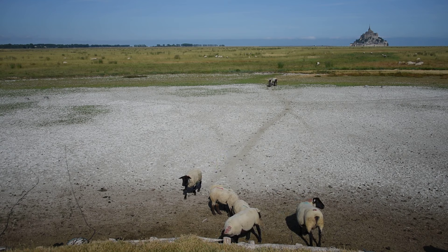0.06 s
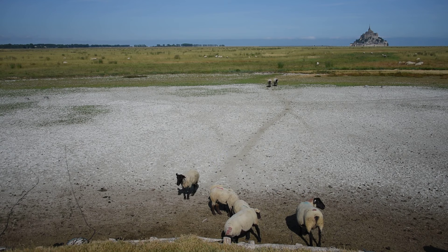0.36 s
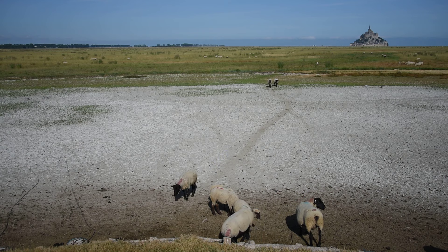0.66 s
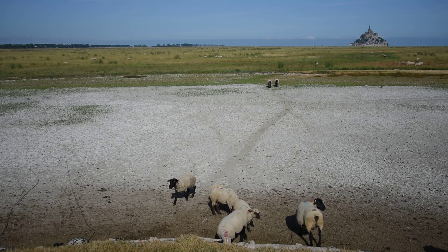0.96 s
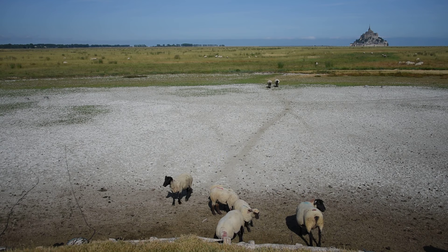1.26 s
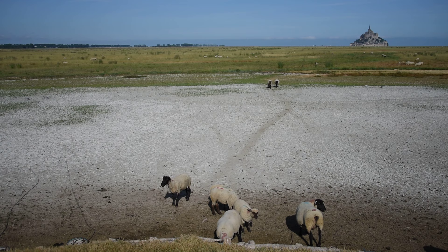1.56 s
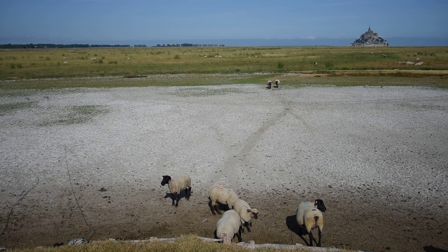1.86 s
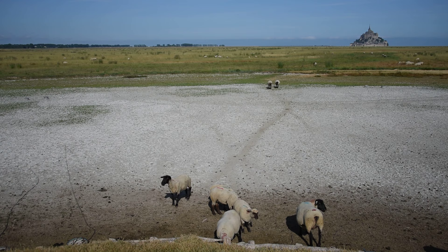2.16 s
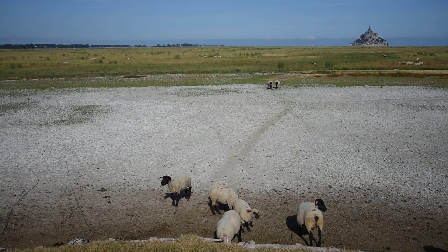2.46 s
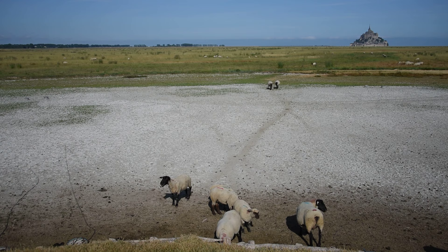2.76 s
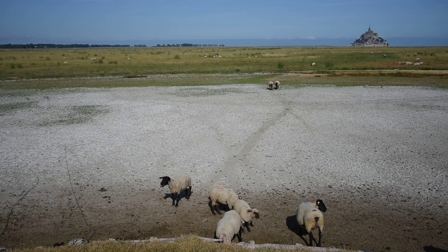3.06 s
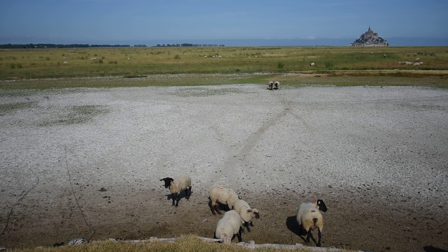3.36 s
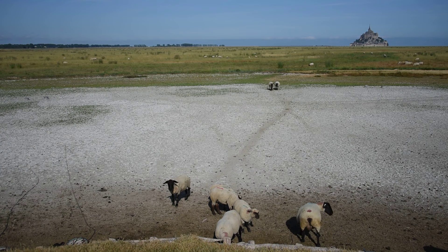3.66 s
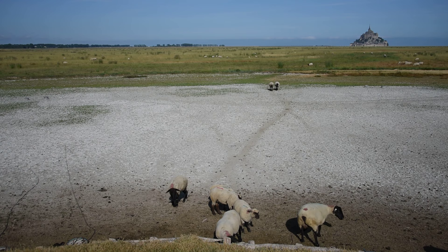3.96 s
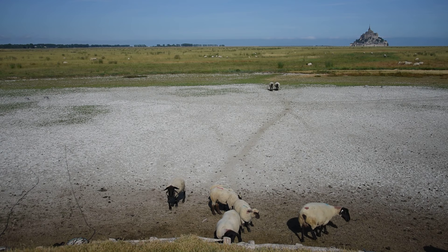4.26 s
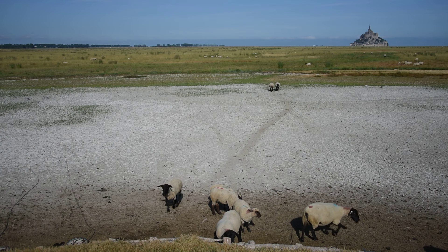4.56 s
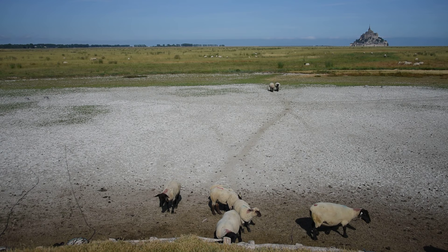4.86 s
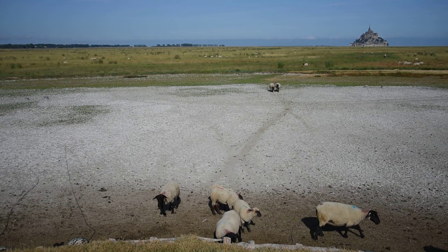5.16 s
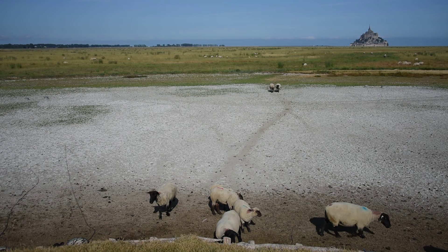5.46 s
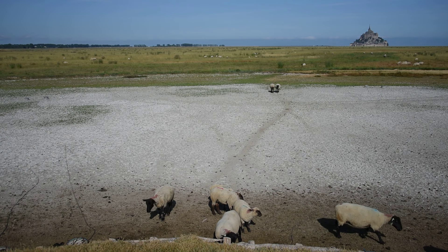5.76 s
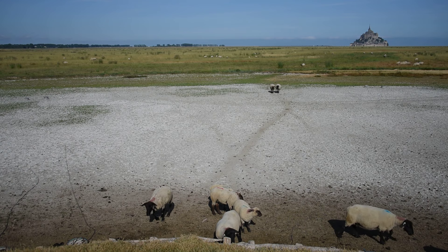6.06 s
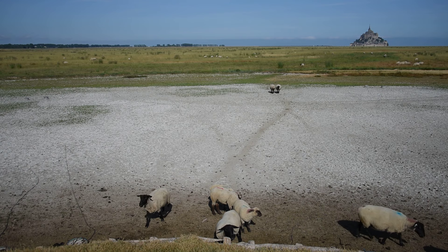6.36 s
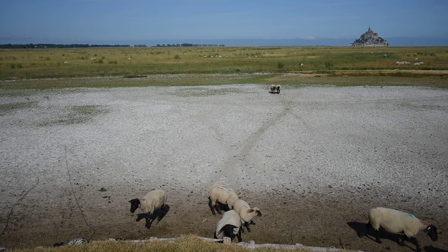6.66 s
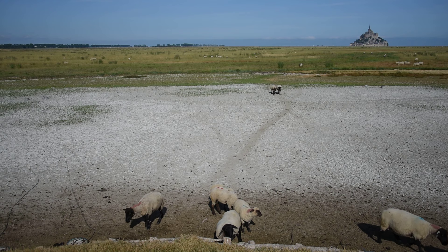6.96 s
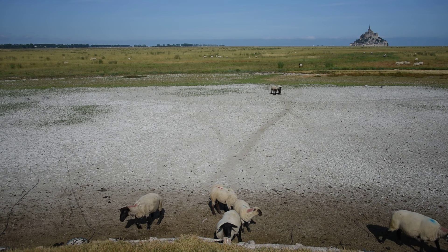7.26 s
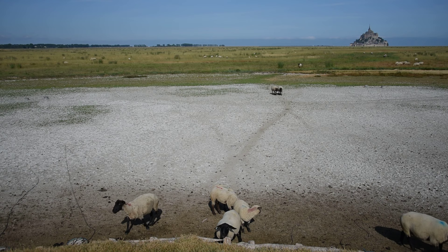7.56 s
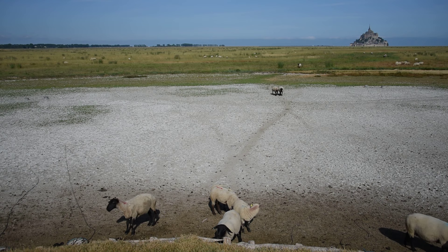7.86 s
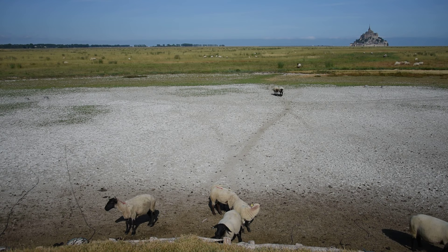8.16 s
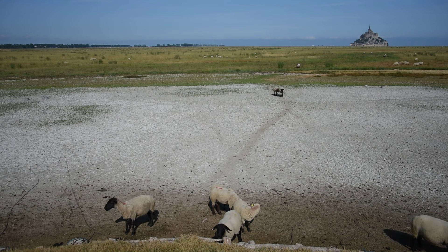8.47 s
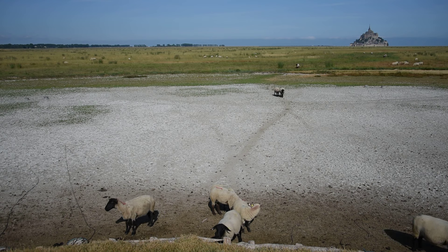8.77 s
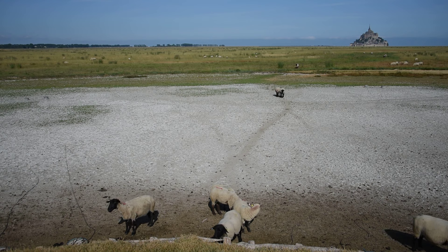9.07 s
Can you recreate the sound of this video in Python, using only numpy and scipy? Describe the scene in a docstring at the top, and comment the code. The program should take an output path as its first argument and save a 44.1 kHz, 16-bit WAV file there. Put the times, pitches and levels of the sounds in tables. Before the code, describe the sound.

A sheep close by gives a short closed-mouth hum followed by a single clear, steady bleat lasting about a second. Before and after it, uneven gusts buffet the microphone over a faint hiss, with soft rustles of dry grass and light handling clicks. A distant small bird whistles faintly, mostly after the bleat. The place is open ground with no echo.

```python
"""An open mud flat, heard through the two microphone ports of a hand-held camera.
From the start wind buffets the ports, mostly the right, over a hiss of air and a faint electronic buzz
on the left. Dry grass rustles, the case ticks and creaks under a finger, and a small bird sings far off.
Two seconds in, a sheep hums through its nose, then opens its mouth in one long, clean bleat, its vocal
folds ringing the throat. Afterwards the bird sings on through the gusts."""
import sys
import numpy as np
from scipy import signal
from scipy.fft import rfft, irfft
from scipy.io import wavfile

SR = 44100
rng = np.random.default_rng(int(sys.argv[2]) if len(sys.argv) > 2 else 0)


def int16_out(signal):
    """Quantize to a 16-bit WAV file."""
    q = np.round(np.clip(np.atleast_2d(signal).T, -1, 1) * 32767)
    wavfile.write(sys.argv[1], SR, q.astype(np.int16))


N = 406602
TIME = np.arange(N) / SR


def amp(db):
    """Decibels to gain."""
    return 10 ** (np.asarray(db) / 20)


def unit_rms(x):
    """Scales each channel to rms 1."""
    return x / np.sqrt(np.mean(x ** 2, -1, keepdims=True) + 1e-30)


def curve(rows, at):
    """A table's other columns, interpolated along its first."""
    knots, *columns = np.transpose(rows)
    return [np.interp(at, knots, column) for column in columns]


def spectrum_db(points, hz):
    """A spectrum in dB, joined on a log-frequency axis."""
    return curve([(np.log(f), db) for f, db in points], np.log(hz + 1))[0]


def resonances(modes, hz):
    """Gain of a set of steep-sided resonances."""
    return np.sqrt(sum((amp(db) / (1 + ((hz - f) / width) ** 2)) ** 2 for f, width, db in modes))


def struck(gain):
    """Gives a gain curve the phase of a struck, ringing body."""
    log_gain = np.log(np.maximum(np.r_[gain, gain[-2:0:-1]], 1e-5))
    return np.exp(np.conj(signal.hilbert(log_gain)))[:len(gain)]


def noise(gain_at):
    """Unrelated noise for each port, coloured by a function of frequency."""
    white = rfft(rng.standard_normal((2, N)))
    return unit_rms(irfft(white * gain_at(np.fft.rfftfreq(N, 1 / SR)), N))


def drift(hz):
    """Random wandering up to about hz, for each port."""
    return noise(lambda f: np.exp(-(f / hz) ** 2))


def pan(left_db):
    """Port gains of mean power 1, the left louder by left_db."""
    gains = amp(np.array([[.5], [-.5]]) * left_db)
    return gains / np.sqrt(np.mean(gains ** 2, 0))


def add(mix, start_s, sound):
    """Mixes a sound in at start_s."""
    part = mix[..., round(start_s * SR):][..., :sound.shape[-1]]
    part += sound[..., :part.shape[-1]]


# The breeze across the flat, at each port: time_s, left_level_db, right_level_db
BREEZE = [(0, -33, -26.5), (1.2, -33.5, -25), (2.3, -36, -25.5), (2.6, -28.5, -22.5), (3.1, -32.5, -22.5),
          (4.1, -29, -22.5), (4.95, -32.5, -21.5), (5.6, -28.5, -23), (6.4, -36.5, -27),
          (7.7, -33.5, -30.5), (9.2, -34, -28.5)]
# Gusts at one port: middle_s, length_s, rumble_rise_db, flutter_rise_db, port (0 left, 1 right)
GUSTS = [(0.303, 0.12, 4, 7.5, 1), (0.671, 0.31, 2, 14.5, 1), (0.83, 0.28, 5, 11, 1),
         (1.234, 0.078, 3.5, 9.5, 1), (1.416, 0.12, 6, 18.5, 1), (1.502, 0.091, 3, 18.5, 1),
         (1.507, 0.15, 2, 22, 0), (1.711, 0.11, 7.5, 16.5, 1), (1.999, 0.075, 7, 16, 1),
         (2.122, 0.31, 7.5, 31, 0), (2.225, 0.1, 5.5, 11, 1), (3.24, 0.25, 9.5, 10, 0),
         (3.837, 0.59, 5, 15.5, 0), (3.876, 0.3, 2.5, 6.5, 1), (4.708, 0.32, 2, 8, 1),
         (5.662, 0.082, 6, 14.5, 0), (6.42, 0.35, 2.5, 11, 1), (6.76, 0.4, 5, 13, 1),
         (7.029, 0.1, 7, 27, 0), (7.054, 0.18, 7, -1, 1), (7.449, 0.14, 9.5, 16, 1),
         (7.715, 0.2, 6, 12.5, 1), (8.034, 0.16, 9, 14.5, 1), (8.304, 0.32, 3, 12, 1),
         (9.154, 0.026, 16, 22, 1)]


def wind_levels(calm_db=-26.5, calm_flutter_db=-39.5, flutter_slope=2.48):
    """Gusts arch over the breeze; flutter grows with the breeze more steeply than rumble."""
    rumble_db = np.array(curve(BREEZE, TIME))
    flutter_db = calm_flutter_db + flutter_slope * (rumble_db - calm_db)
    for middle_s, length_s, rumble_rise_db, flutter_rise_db, port in GUSTS:
        arch = signal.windows.cosine(int(length_s * SR))
        add(rumble_db[port], middle_s - length_s / 2, rumble_rise_db * arch)
        add(flutter_db[port], middle_s - length_s / 2, flutter_rise_db * arch)
    return rumble_db, flutter_db


def eddy(hz, turns=0.43):
    """An eddy passing a port is one swing of pressure, up and then down, centred in 50 ms."""
    t = np.arange(-SR // 40, SR // 40) / SR
    return -np.sin(2 * np.pi * hz * t) / np.cosh(hz * t / turns) ** 2


def sputter(each_per_s=4, slow_hz=160, fast_hz=310):
    """Small eddies of four sizes hit each port at random; the quicker ones are weaker."""
    out = np.zeros((2, N))
    for hz in np.geomspace(slow_hz, fast_hz, 4):
        hits = (rng.random((2, N)) < each_per_s / SR).astype(float)
        out += signal.oaconvolve(hits, eddy(hz)[None], "same", axes=1) * np.sqrt(slow_hz / hz)
    return out


# Rumble on the microphone; the right port faces the wind and rumbles higher: frequency_hz, gain_db
LEFT_RUMBLE = [(12, -33), (25, -33), (40, -8), (65, 7), (105, -1.5), (160, -3), (220, -14), (300, -24.5),
               (450, -33), (700, -67)]
RIGHT_RUMBLE = [(12, -50), (25, -30), (40, -6), (62, -3.5), (105, 0.5), (160, -3.5), (220, -8.5),
                (300, -18), (450, -45), (700, -100)]
# The flutter above the rumble, at both ports: frequency_hz, gain_db
FLUTTER = [(100, -38), (170, -7.5), (240, -1), (320, -4), (420, -12.5), (550, -24), (750, -35.5),
           (1100, -48), (2500, -54.5), (6000, -100)]


def wind(rumble_swing_db=3.5, flutter_swing_db=7.5, eddy_hz=60):
    """Each port has its own eddies, which shake the flutter harder than the rumble."""
    rumble_db, flutter_db = wind_levels()
    eddies = np.clip(drift(eddy_hz), -2, 2)
    rumble = noise(lambda f: amp([spectrum_db(LEFT_RUMBLE, f), spectrum_db(RIGHT_RUMBLE, f)]))
    rumble = unit_rms(rumble * amp(rumble_swing_db * eddies))
    flutter = noise(lambda f: amp(spectrum_db(FLUTTER, f)))
    flutter = unit_rms(flutter * amp(flutter_swing_db * eddies))
    return amp(rumble_db) * rumble + amp(flutter_db) * (amp(-3) * flutter + amp(11) * sputter())


# The colour of the open air: frequency_hz, gain_db
AIR = [(100, -88), (500, -61.5), (1000, -64.5), (2500, -69), (5000, -73), (10000, -71.5), (12000, -73),
       (13500, -90), (16000, -71.5)]


def air(level_db=-58.5):
    """A faint, steady hiss of air all around the microphone."""
    return amp(level_db) * noise(lambda f: amp(spectrum_db(AIR, f)))


# Resonances of the buzz inside the camera: centre_hz, half_width_hz, gain_db
BUZZ_MODES = [(5680, 170, -11), (6450, 190, -6), (7000, 170, -12), (7700, 210, 0), (8350, 200, -5),
              (10200, 900, -14)]
# Steady whines at the left port: pitch_hz, level_db
WHINES = [(8086, -66), (11806, -76), (15735, -75)]


def electronics(repeat_hz=59.94, burst_at_s=0.00401, burst_s=0.00067, buzz_db=-61, right_db=-22):
    """By the left port a short burst repeats at the picture rate and rings the case, beside thin whines."""
    period = round(SR / repeat_hz)
    t, hz = np.arange(period) / SR, np.fft.rfftfreq(period, 1 / SR)
    burst = rfft(rng.standard_normal(period) * np.exp(-.5 * ((t - burst_at_s) / burst_s) ** 2))
    cycle = irfft(np.exp(1j * np.angle(burst)) * resonances(BUZZ_MODES, hz), 20 * period)  # oversampled
    buzz = unit_rms(cycle[(TIME * repeat_hz % 1 * len(cycle)).astype(int)])
    whine = sum(np.sqrt(2) * amp(db) * np.sin(2 * np.pi * f * TIME) for f, db in WHINES)
    return amp([[0], [right_db]]) * (amp(buzz_db) * buzz + whine)


# Dry grass stirring left of the microphone: start_s, length_s, level_db, left_over_right_db
RUSTLES = [(0.21, 0.22, -54, 15), (0.362, 0.33, -56.5, 15), (0.626, 0.072, -53, 15), (1.158, 0.24, -58, 17),
           (1.464, 0.49, -54.5, 8), (1.817, 0.23, -50, 6.5), (4.082, .17, -60.5, 7), (5.302, 0.35, -63, 7),
           (5.767, 0.41, -64, 5), (7.405, 0.19, -60.5, 1)]
# The colour of its crackle: frequency_hz, gain_db
CRACKLE = [(600, -19), (2000, 10.5), (4500, 9), (8500, 10), (12000, 9), (16000, -4)]


def grass(grain_db=3.5, grain_hz=210):
    """Dry blades brush in short swells of fine crackle."""
    swells = np.zeros((2, N))
    for start_s, length_s, db, left_db in RUSTLES:
        add(swells, start_s, pan(left_db) * amp(db) * signal.windows.tukey(int(length_s * SR), .8))
    hiss = noise(lambda f: amp(spectrum_db(CRACKLE, f)))
    return swells * unit_rms(hiss * amp(grain_db * drift(grain_hz)[0]))


# Ticks of the camera, right at the microphone: start_s, peak_db, ring_hz, left_over_right_db
TICKS = [(.311, -35, 4480, 13), (0.784, -32.5, 2310, -1), (1.214, -39.5, 1660, 3), (4.571, -34, 3200, 5),
         (4.671, -40, 1690, -21), (4.747, -40.5, 2700, 6), (5.366, -31.5, 1250, -29), (5.439, -38, 3100, 6),
         (5.647, -43, 4800, 3), (5.856, -43, 2980, -2)]


def ticks(width_share=0.44, rattle_s=0.0014):
    """The hand-held case gives small, sharp rattles that die within milliseconds."""
    out, hz = np.zeros((2, N)), np.fft.rfftfreq(1024, 1 / SR)
    for start_s, peak_db, ring_hz, left_db in TICKS:
        ring = irfft(struck(resonances([(ring_hz, width_share * ring_hz, 0), (6000, 4000, -19)], hz)))
        rattle = rng.standard_normal(len(ring)) * np.exp(-TIME[:len(ring)] / rattle_s)
        tick = signal.fftconvolve(ring, rattle)
        add(out, start_s, pan(left_db) * amp(peak_db) * tick / abs(tick).max())
    return out


# Thumps of wind on the microphone: middle_s, strength_db, swing_hz, port (0 left, 1 right)
BUFFETS = [(.544, -5, 146, 1), (.623, -8, 374, 1), (0.65, -8.5, 390, 1), (.704, -11, 227, 1),
           (1.214, -5.5, 110, 1), (1.497, -16.5, 395, 0), (1.679, -7.5, 183, 1), (1.718, -9, 240, 1),
           (3.83, -4.5, 265, 0), (3.87, -17.5, 400, 0), (3.947, -14.5, 385, 0), (4.057, -25.5, 480, 0),
           (4.415, -6, 128, 1), (4.455, -6, 232, 1), (4.616, -5, 253, 1), (4.673, -14, 427, 1),
           (4.734, -17.5, 372, 1), (4.777, -22, 324, 1), (4.818, -21, 357.8, 1), (5.015, -14, 320, 1),
           (5.365, -4, 213, 1), (5.442, -8.5, 140, 1), (5.758, -14, 344, 1), (6.308, -6.5, 127, 1),
           (7.03, -15, 370, 0), (8.091, -3, 284, 1), (8.191, -6.5, 143, 1), (8.287, -18.5, 338, 1),
           (9.152, -12, 320, 1)]


def buffets(gain_db=-1.5):
    """The strongest eddies thump one port each."""
    out = np.zeros((2, N))
    for middle_s, db, hz, port in BUFFETS:
        swing = eddy(hz)
        add(out[port], middle_s - len(swing) / SR / 2, amp(db + gain_db) * swing)
    return out


# Resonances of the camera case: centre_hz, half_width_hz, gain_db
CASE_MODES = [(2900, 170, -1.5), (3570, 150, 6.5), (3840, 130, 0), (4540, 100, 2.5)]
# A finger slipping close to the left port: start_s, length_s, level_db, pitch_factor, scrape_db
SLIPS = [(0.632, 0.044, -45.5, 1.006, -6), (0.625, 0.33, -56, 1.01, -8), (0.813, 0.034, -50.5, 1, -6),
         (0.978, 0.044, -49, 0.97, -10), (1.207, 0.04, -57.5, .96, -5)]


def finger_creaks(left_db=7, jerks_per_s=1300, spread_db=3, scrape_hz=4800, scrape_width_hz=2200):
    """Skin sticks and lets go in uneven jerks; each one scrapes and rings the case."""
    out, hz = np.zeros((2, N)), np.fft.rfftfreq(1024, 1 / SR)
    for start_s, length_s, db, factor, scrape_db in SLIPS:
        n = int(length_s * SR)
        jerks = (rng.random(n) < jerks_per_s / SR) * rng.choice([-1, 1], n)
        jerks = unit_rms(jerks * amp(spread_db * rng.standard_normal(n))) * signal.windows.tukey(n, .6)
        modes = CASE_MODES + [(scrape_hz, scrape_width_hz, scrape_db)]
        ring = irfft(struck(resonances(modes, hz / factor)))
        add(out, start_s, pan(left_db) * amp(db) * signal.fftconvolve(jerks, ring / np.linalg.norm(ring)))
    return out


# The song from far across the flat: start_s, note_count, first_spacing_s, note_length_s, level_db,
# swell_per_note_db, pitch_factor, climb_per_note, shape_name
PHRASES = [(1.189, 1, 0, 0.26, -60, -1, 0.99, 0, "whistle"),
           (3.485, 2, 0.13, 0.086, -74, 0, 1, -0.17, "hook"),
           (3.924, 1, 0, 0.25, -55.5, -3, 0.98, 0, "whistle"),
           (4.338, 2, .285, 0.18, -50.5, -3, 0.98, -0.011, "slur"),
           (5.014, 4, 0.14, 0.052, -64, -2, 0.95, -0.015, "dip"),
           (5.791, 3, .171, 0.058, -64.5, 5, 1.08, -0.062, "pip"),
           (6.353, 3, 0.198, 0.058, -63, 2.5, 1.02, -0.017, "pip"),
           (6.937, 1, 0, 0.074, -56, 0, .98, 0, "flick"), (7.09, 5, .187, 0.108, -69, 0, 1, .004, "hook"),
           (8.169, 4, 0.12, 0.088, -57, 0.6, 1.01, -0.012, "flick"),
           (8.784, 1, 0, .16, -47, 0, 0.99, 0, "slur"), (9.134, 1, 0, 0.052, -63, 0, 1, 0, "dip")]


def song(slowing=1.04, spread_db=2.5):
    """Each phrase repeats one note, slowing a little, no two notes equally strong."""
    for start_s, count, spacing_s, length_s, db, swell_db, factor, climb, shape in PHRASES:
        for k in range(count):
            note_db = db + k * swell_db + spread_db * rng.uniform(-1.3, 1)
            yield start_s, length_s, note_db, factor + k * climb, shape
            start_s += spacing_s * slowing ** k


def scatter(x, fade_s=0.011, wet_db=-5):
    """Ground and grass smear a far sound with a brief diffuse tail at each port."""
    t = TIME[:SR // 8]
    tail = unit_rms(rng.standard_normal((2, len(t))) * np.exp(-t / fade_s)) / np.sqrt(len(t))
    diffuse = signal.oaconvolve(x[None], tail, axes=1)[:, :N]
    return (x + amp(wet_db) * diffuse) / np.hypot(1, amp(wet_db))


# The bird's note shapes by name: trill_depth (0-1), then points of share_of_note, base_pitch_hz, gain_db
NOTE_SHAPES = { "whistle": (.1, [(0, 4080, -17), (.3, 4320, -1), (.82, 4560, 1), (.9, 3900, -6),
               (1, 2880, -8)]), "slur": (0.82, [(0, 3530, -18), (.42, 4260, -6.5), (.8, 4620, -6.5),
               (.89, 3900, -9), (1, 2960, -5)]), "hook": (0.45, [(0, 4080, -3), (.3, 4560, 10),
               (.37, 4780, 5), (.48, 3850, 3), (.58, 3330, 9), (.8, 3180, 12), (1, 2880, 3)]),
               "pip": (0, [(0, 3740, -3), (.33, 3790, 1.5), (.65, 3735, 0), (1, 3540, -12)]),
               "dip": (0.28, [(0, 4340, 2), (.27, 4240, 3.5), (.34, 3680, -10), (.56, 3970, 1),
               (.62, 3100, -12), (.85, 3250, 9), (1, 2750, -10)]), "flick": (0.65, [(0, 2460, -18),
               (.25, 2105, -14.5), (.56, 2840, -6.5), (.64, 3300, -30), (.68, 4400, 3), (.75, 4620, 5.5),
               (.87, 3740, -7), (1, 3100, -21)])}


def bird(left_db=2, waver_share=0.0077, flicker_db=2, trill_hz=110, swing_hz=130, trill_db=4):
    """A far whistle glides through each note, some with a fast trill, wavering in the moving air."""
    out, wobble, flicker = np.zeros(N), drift(210)[0], drift(63)[0]
    for start_s, length_s, db, factor, shape in song():
        progress = np.linspace(0, 1, int(length_s * SR))
        t = progress * length_s
        depth, points = NOTE_SHAPES[shape]
        hz, shape_db = curve(points, progress)
        trill = depth * np.sin(2 * np.pi * trill_hz * t)
        waver = 1 + waver_share * np.interp(start_s + t, TIME, wobble)
        turns = np.cumsum(hz * factor * waver + swing_hz * trill) / SR
        envelope = amp(db + shape_db + trill_db * trill) * signal.windows.tukey(len(t), .12)
        add(out, start_s, envelope * np.sin(2 * np.pi * turns))
    return pan(left_db) * scatter(out * amp(flicker_db * flicker))


# The sheep's hum, mouth shut: time_s, pitch_hz, level_db
HUM = [(2.162, 215.4, -59), (2.2, 202.6, -51.5), (2.236, 166.7, -45.5), (2.314, 168, -38),
       (2.382, 173.2, -35.5), (2.398, 176, -47.5)]


def hum(now_s, start_s, end_s, rest_hz=168, tighten_s=0.014):
    """The voice sinks and swells, clear until it tightens and cracks; the larynx moves with the pitch."""
    pitch_hz, db = curve(HUM, now_s)
    crack = np.exp((now_s - end_s) / tighten_s)
    mouth, nasal = 0, 1
    tongue = (pitch_hz / rest_hz) ** 0.31 + 0.29 * crack  # factor on the resonance frequencies
    breath_db = -22 + 19 * crack
    jitter = .0018 + 0.018 * crack ** 2  # unevenness of the folds, as a share of a cycle
    return pitch_hz, db, mouth, nasal, tongue, breath_db, jitter


# Resonances of the sheep's nose: centre_hz, half_width_hz, gain_db
NOSE_MODES = [(895, 104, 5.5), (1350, 370, -8), (1810, 150, 3), (2240, 150, -2.5), (2610, 130, -2),
              (2950, 200, -12), (3860, 400, -20), (5040, 260, -21), (8700, 2600, -21.5)]


def nose(hz, tongue):
    """Gain of the nasal passage, its resonances lifted by the tongue."""
    return resonances(NOSE_MODES, hz / tongue)


# The mouth through the bleat: time_s, stage (0 lips parting, 1 wide open, 2 closing), level_db
MOUTH = [(2.41, 1.5, -51), (2.428, 1, -32), (2.466, 0.2, -24.5), (2.57, 0.95, -25.5), (2.65, 1.36, -24),
         (2.77, 1.3, -23), (2.9, 0.98, -22), (3.05, 0.9, -23), (3.22, 1.3, -25), (3.28, 1.6, -27.5),
         (3.352, 1.3, -33), (3.366, 1, -46)]


def bleat(now_s, start_s, end_s, held_hz=205.9, scoop_hz=28, scoop_s=.195, drop_hz=62, drop_s=0.038):
    """Slack folds scoop up to a held note, which drops in a breathy catch as the air runs out."""
    slack = np.exp((start_s - now_s) / scoop_s)
    catch = np.exp((now_s - end_s) / drop_s)
    pitch_hz = held_hz - scoop_hz * slack - drop_hz * catch
    mouth, db = curve(MOUTH, now_s)
    nasal = np.exp((start_s - now_s) / 0.0063)  # the voice moves from nose to mouth
    tongue = 1 + 0.38 * catch ** 2
    breath_db = -30 + 7 * slack + 24 * catch
    jitter = .00028 + .0012 * (slack + catch) ** 2
    return pitch_hz, db, mouth, nasal, tongue, breath_db, jitter


# Resonances of the sheep's throat: parting_hz, wide_open_hz, half_width_hz, parting_db, wide_open_db,
# closing_db
THROAT_MODES = [(553, 606, 54, 5, 5.5, 2.5), (722.22, 870, 200, -23, -16.5, -2.5),
                (844, 1160, 195, -20, -8.5, -13), (980, 1466, 85, -9.5, -5, -6.5),
                (1320, 1670, 87, -22, -15, -13), (1380, 2070, 136, -3.5, -6, -5),
                (2150, 2260, 200, 2, -8, -19), (2530, 2520, 139, -3, -4.5, -5),
                (3080, 2980, 190, -14, -13, -12.5), (3700, 3600, 150, -29, -26.5, -37),
                (3820, 4130, 90, -21, -23.5, -30), (4630, 4520, 82, -20, -25, -21),
                (4900, 5050, 170, -21, -40, -29), (5600, 6070, 310, -33, -24, -45),
                (6500, 7070, 120, -32, -25.5, -39), (8600, 8870, 720, -32.5, -29, -43),
                (10200, 10500, 220, -50, -25.5, -43), (10950, 11240, 140, -41, -22.5, -42),
                (12400, 12500, 400, -51, -42, -55)]


def throat(hz, now_s, mouth, tongue, breath_db, quiver, high_hz=3400, wander_hz=5, wander_db=2):
    """Gain of the soft throat: mouth, jaw and tongue slide its resonances, and the high ones wander."""
    modes = [(5150, 280, breath_db - 4)]  # the rasp of rushing air
    jaw_lift = 0.027 * np.exp(-((now_s - 2.9) / 0.18) ** 2)  # the jaw drops furthest at 2.9 s
    for k, ((parting_hz, wide_hz, width_hz, *stage_dbs), chance) in enumerate(zip(THROAT_MODES, quiver)):
        centre_hz = wide_hz + (parting_hz - wide_hz) * max(1 - mouth, 0)
        centre_hz *= 1 + jaw_lift * (high_hz < wide_hz < 4800)
        turns = wander_hz * (.5 + chance[:2]) * now_s + chance[2:]
        slide, swell = np.sin(2 * np.pi * turns) * (centre_hz > high_hz)
        centre_hz *= (tongue if k else 1) * (1 + .005 * slide)  # the tongue spares the lowest
        modes.append((centre_hz, width_hz, np.interp(mouth, [0, 1, 2], stage_dbs) + wander_db * swell))
    return resonances(modes, hz)


def fold_cycles(hum_s=(2.165, 2.41), bleat_s=(2.408, 3.372), waver_hz=14, waver_share=.001):
    """The time and the state of the voice at each closing of the folds, through hum and bleat."""
    waver = 1 + waver_share * drift(waver_hz)[0]
    for call, (start_s, end_s) in ((hum, hum_s), (bleat, bleat_s)):
        now_s = start_s
        while now_s < end_s:
            pitch_hz, *state = call(now_s, start_s, end_s)
            yield now_s, pitch_hz, *state
            mid_cycle_hz = call(now_s + .5 / pitch_hz, start_s, end_s)[0]
            now_s += 1 / max(mid_cycle_hz * waver[int(now_s * SR)], 100)


def sheep(hiss_hz=4500, hiss_gain=5, puff_s=0.0082, chest_hz=430, shimmer_db=.25, size=2048):
    """Each snap of the vocal folds, with its puff of air, rings the nose or the throat."""
    hz, t, voice = np.fft.rfftfreq(size, 1 / SR), TIME[:size], np.zeros(N)
    quiver = rng.random((len(THROAT_MODES), 4))  # two wander rates and two phases per resonance
    treble_lift = np.hypot(1, hiss_gain * hz ** 3 / (hz ** 3 + hiss_hz ** 3))
    for now_s, pitch_hz, db, mouth, nasal, tongue, breath_db, jitter in fold_cycles():
        oral = throat(hz, now_s, mouth, tongue, breath_db, quiver)
        tract = np.hypot(nasal * nose(hz, tongue), (1 - nasal) * oral)
        body = struck(tract * hz ** 2 / (hz ** 2 + chest_hz ** 2))
        snap_s = now_s + jitter * rng.standard_normal() / pitch_hz
        snap = np.exp(-2j * np.pi * hz * (snap_s - round(snap_s * SR) / SR))  # falls between samples
        puff = rfft(unit_rms(rng.standard_normal(size) * np.exp(-t / puff_s))) / np.sqrt(size)
        pulse = irfft(body * (snap + amp(breath_db) * treble_lift * puff))
        pulse = unit_rms(pulse) * np.sqrt(SR / pitch_hz / size)
        add(voice, snap_s, pulse * amp(db + shimmer_db * rng.standard_normal()))
    return voice


# The sheep's balance at the microphone: frequency_hz, left_over_right_db
SHEEP_BALANCE = [(500, 1.5), (2400, -1), (4400, 2.5), (12000, 8)]


def from_left(voice, lead_s=.00005, shadow_hz=1800):
    """The sheep stands a little to the left, so that port hears its treble first."""
    hz = np.fft.rfftfreq(N, 1 / SR)
    lead = np.exp(1j * np.pi * hz * np.tanh(hz / shadow_hz) * lead_s * np.array([[1], [-1]]))
    return irfft(rfft(voice) * pan(spectrum_db(SHEEP_BALANCE, hz)) * lead, N)


def scene():
    """Open ground with no walls: near and far sounds meet at the two ports."""
    background = wind() + air() + electronics()
    return background + grass() + ticks() + buffets() + finger_creaks() + bird() + from_left(sheep())


def record(dry, edge_hz=15930):
    """The recorder's band limit cuts off the highest treble."""
    low_pass = signal.firwin(1023, edge_hz, window=("kaiser", 9), fs=SR)
    return signal.oaconvolve(dry, low_pass[None], "same", axes=1)


dry = scene()
out = record(dry)
int16_out(out)
```